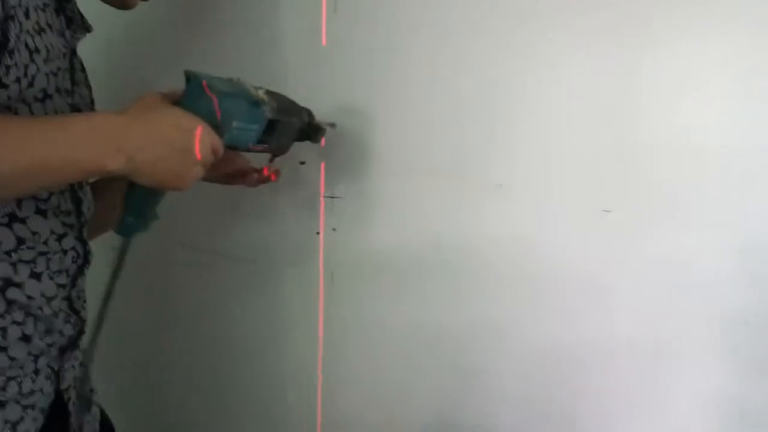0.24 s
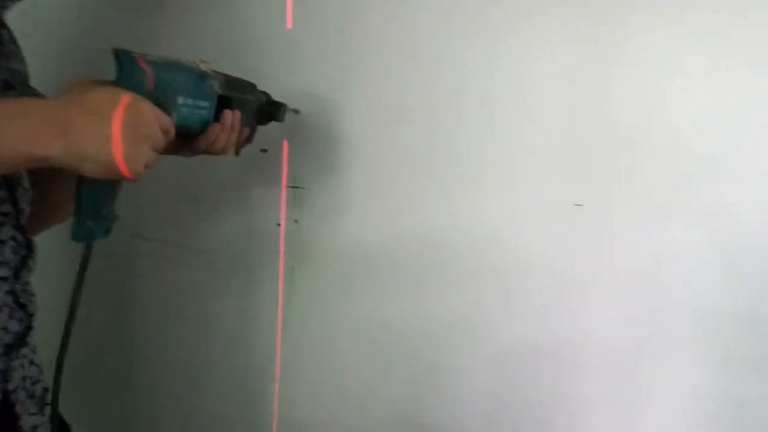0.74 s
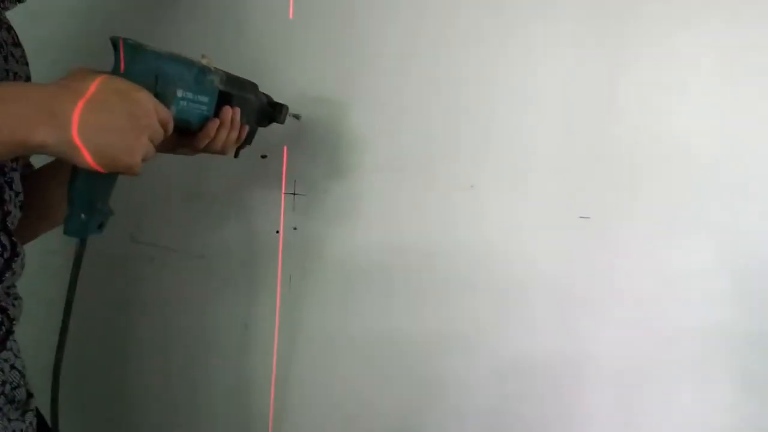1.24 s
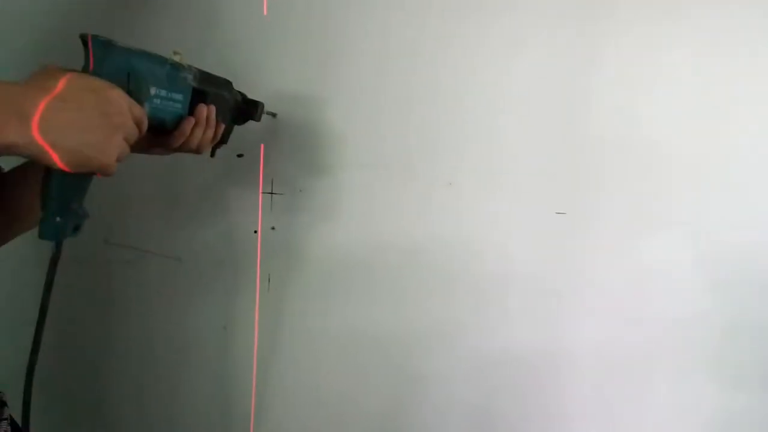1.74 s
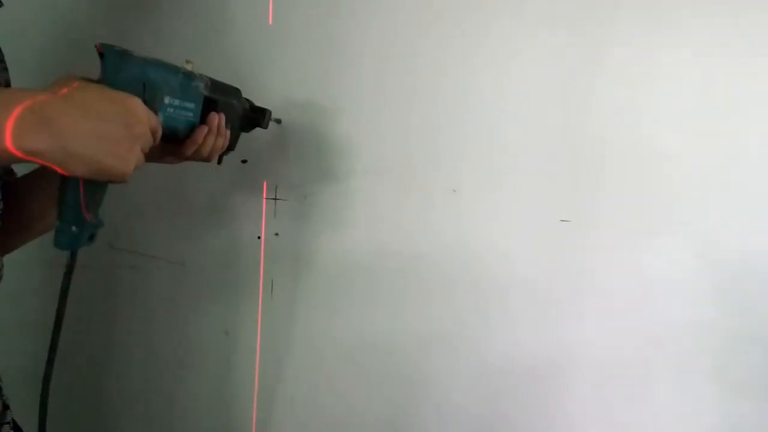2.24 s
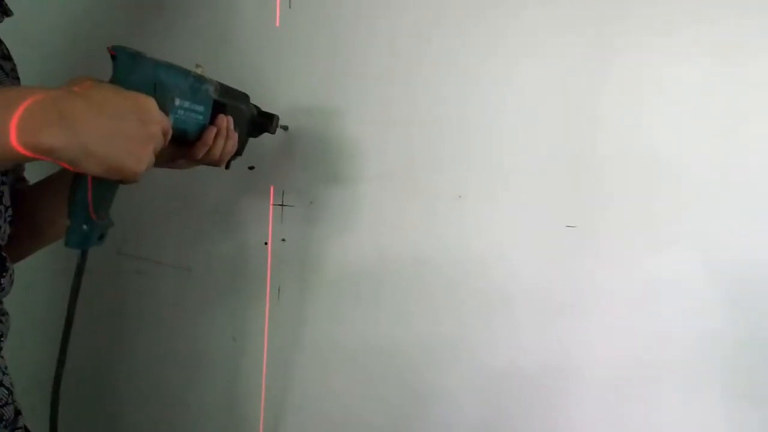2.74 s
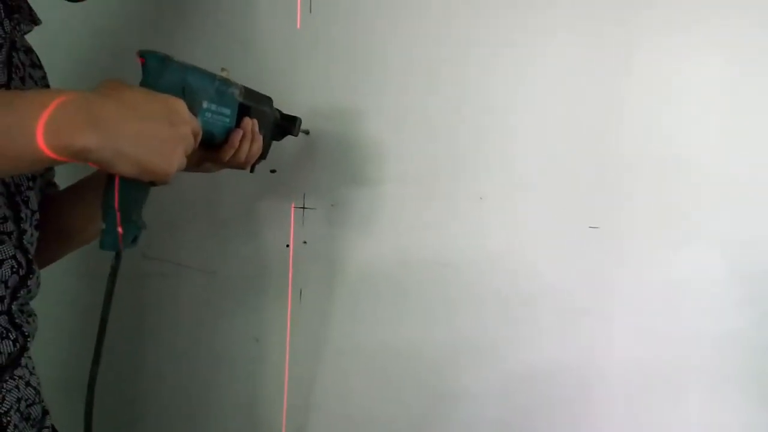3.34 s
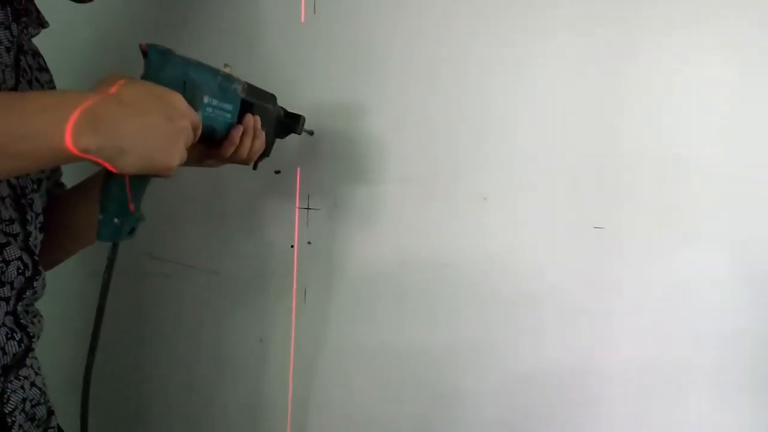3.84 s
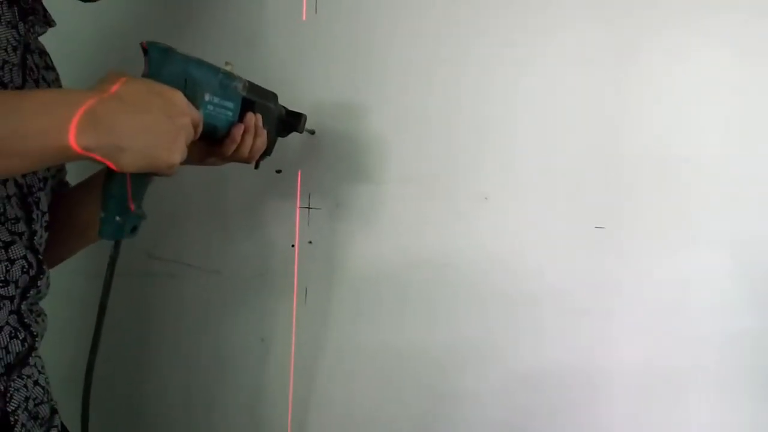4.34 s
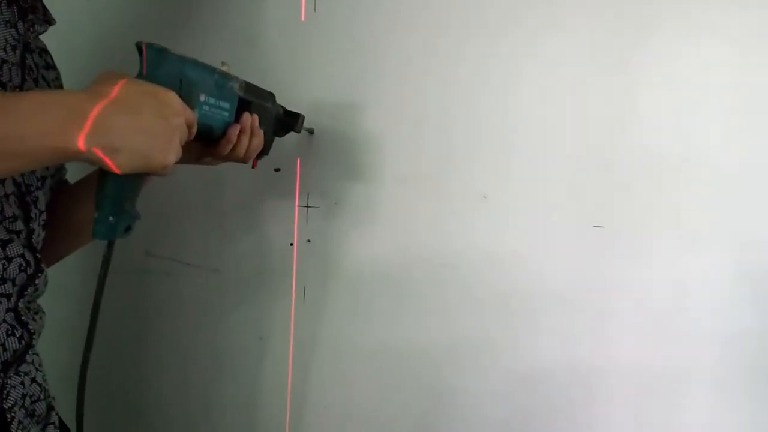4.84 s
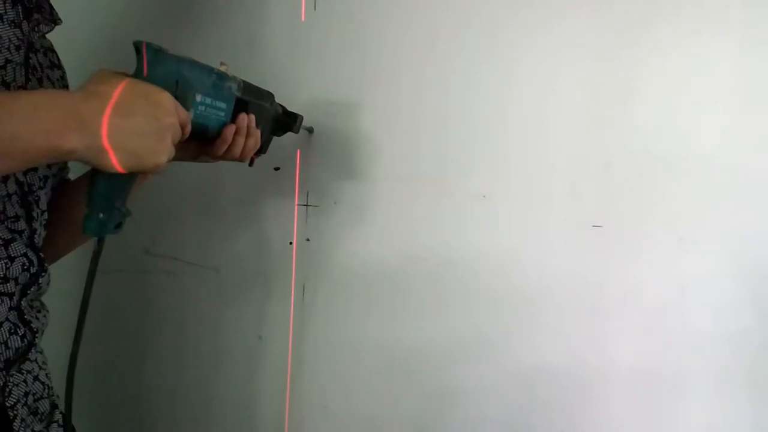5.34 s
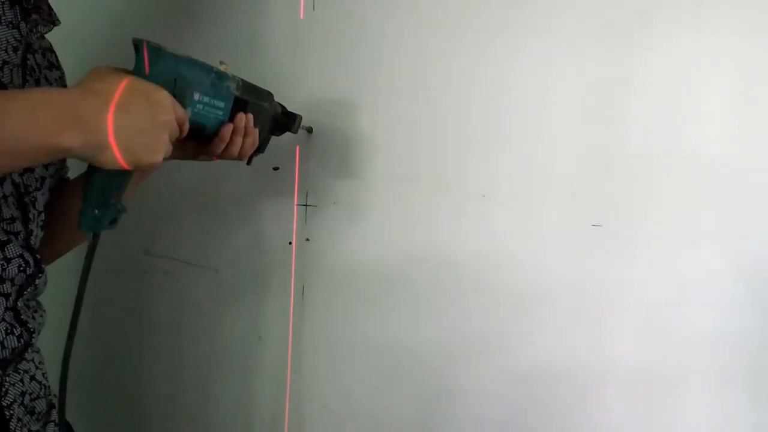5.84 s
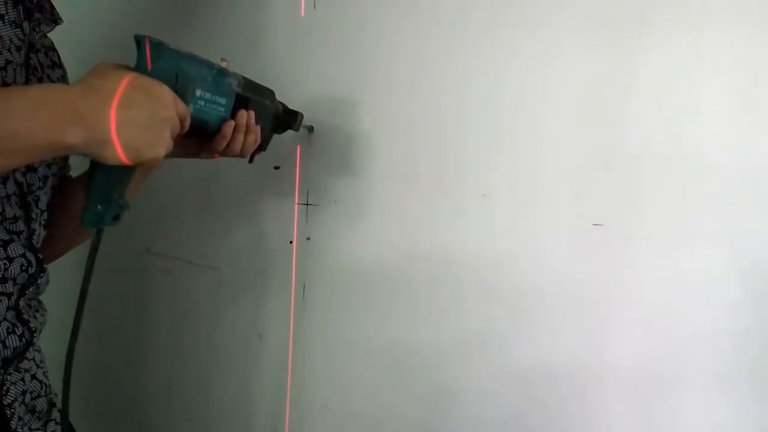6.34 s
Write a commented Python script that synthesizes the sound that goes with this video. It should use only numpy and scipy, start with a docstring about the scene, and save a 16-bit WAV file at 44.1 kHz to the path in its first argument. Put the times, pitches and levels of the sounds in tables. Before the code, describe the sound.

In a bare, reverberant room, faint hiss and a few light bit taps precede a hammer drill. A weak short burst clatters and slows, then a stronger one, then a long loud hammering with deep thumps, each coasting down into echo. A fourth burst speeds up and is cut off. Close stereo microphones overload slightly on the loudest blows.

```python
"""In a bare, echoing room, a hammer drill bites into a masonry wall in four bursts, the last cut off at speed.
Each trigger pull spins up a ratchet, one blow per slipping tooth: single blows speed up to a rattle, then
slow as the motor coasts. Steel modes ring near 6 kHz, pushes and grit knock the wall, noise is the fan and
gear roar; light ticks, far wash and faint tones surround it. The loudest blows overload the microphones."""
import sys
import numpy as np
from scipy import signal
from scipy.fft import rfft, irfft, next_fast_len
from scipy.io import wavfile
from scipy.ndimage import map_coordinates

SR = 44100
rng = np.random.default_rng(int(sys.argv[2]) if len(sys.argv) > 2 else 0)


def master_out(mix):
    """Clip the mix to full scale and print it as 16-bit PCM to the path in sys.argv[1]."""
    frames = np.transpose(np.atleast_2d(mix))
    ceiling = np.clip(frames, -1, 1)
    pcm = np.round(ceiling * 32767).astype(np.int16)
    wavfile.write(sys.argv[1], SR, pcm)


N = 290619

# Ringing modes of bit and chuck. Each row: frequency in Hz, relative level in dB, t60 in seconds.
STEEL_MODES = [(4500, 1, 0.0055), (5533, 4.5, 0.011), (6460, 9, 0.0084), (6524, 7, 0.011),
               (7020, -8.5, 0.018), (7540, 5.5, 0.0035), (8890, 3, 0.0059), (13450, -9.5, 0.024),
               (14700, -37, .012)]
# Colours of the layers, from crushed grit to far wash. Each row: frequency in Hz, relative level in dB per Hz.
CRACK_COLOUR = [(500, -58), (4000, -5.5), (6000, 4.5), (8500, -24.5), (11000, -7.5), (15000, -23)]
WALL_COLOUR = [(60, -37), (130, -18.5), (220, -9), (500, -1.5), (1100, 5), (1900, 3), (2800, -2.5),
               (4500, -6.5), (6500, -0.5), (8000, -8), (10500, -14.5), (15000, -9.5)]
THUMP_COLOUR = [(20, -12), (60, 1), (130, 2.5), (350, -2), (700, -21), (2000, -68)]
REBOUND_COLOUR = [(400, -24), (1500, 1), (3500, -9), (6400, 2), (8500, 1.5), (15000, -39)]
ROAR_COLOUR = [(40, -21.5), (130, -31), (230, -11.5), (500, -7.5), (1000, -1), (1900, 4.5), (2800, 0.5),
               (4200, 0), (6500, 1.5), (8000, -11), (10500, -17), (15000, -39)]
TICK_COLOUR = [(200, -16), (1500, -5.0), (6500, -5.5), (11000, -21.5), (15000, -33)]
WASH_COLOUR = [(30, -46), (60, -20), (100, -19.5), (190, -15), (400, -14), (780, -9.5), (1400, -8),
               (2300, -9.5), (2700, -15), (4500, -18), (6200, -19.5), (9000, -33.5), (11000, -45),
               (15000, -70)]
# Tone of the ring sent into the room. Each row: frequency in Hz, gain in dB.
RING_ROOM_TONE = [(3000, 7.5), (6500, 2), (8000, -3), (10000, -11), (15000, -28)]
# Standing waves between the walls. Each row: frequency in Hz, width in Hz, gain in dB.
STANDING_WAVES = [(198.1, 3.1, -6.5), (236, 2.6, 2), (302.5, 3.1, -4), (383, 2.9, -6), (491.3, 2.35, 8),
                  (573, 8.6, 2.5), (720, 3.1, -9), (806, 2.4, 2.5), (1014, 3.4, -7), (1550, 2.5, -35),
                  (1570, 7.1, -2), (1762, 5.6, 13)]
# Ratchet speed of each pull: spin-up and sometimes early slowing, until the drag rule takes over.
# Each row: time in seconds, teeth a second.
PULL_SPEEDS = [
    [(1.5, 5.53), (1.739, 17.78), (1.904, 22.77), (2.057, 15.49)],
    [(2.893, 1.89), (3.102, 28.61), (3.295, 40.32), (3.395, 37.72), (3.628, 19.55), (3.768, 12.48)],
    [(4.27, 3.17), (4.475, 30.78), (4.64, 38.67), (4.899, 42.47), (5.21, 42.17), (5.382, 50.4),
     (5.597, 49.85)],
    [(6.16, 4.4), (6.331, 36.04), (6.57, 60.62)],
]
# When the first tooth slips. Each entry, one per pull: time in seconds.
FIRST_BLOW_TIMES = [1.583, 3.004, 4.351, 6.2145]
# How hard each pull is pressed. Each row: blow in dB, blow lost as the hand lets go in dB, knock in dB,
# thump in dB, roar in dB.
PULL_LEVELS = [(-8.5, 2, 4.5, -10, -6.5), (-3.5, 14, 3, -16, -6), (-2.5, 12, 3, 1, -4.5),
               (-8.5, 3, 4.5, -6, -6)]
# Moments when the low thump swells, or once dips. Each row: time in seconds, change in thump in dB.
THUMP_SURGES = [(3.165, 20), (3.5, 6), (3.565, 3), (4.68, 26), (4.745, 12), (5.004, 19.5), (5.152, 10.5),
                (5.42, -6)]
# The bit ticks on the wall as the drill is set or jerks into motion. Each row: start in seconds, strength in dB.
TICK_EVENTS = [(0.882, -37), (1.195, -34), (1.313, -43), (1.501, -26.5), (2.483, -31), (2.892, -26)]
# Decay of the bare room. Each row: frequency in Hz, t60 in seconds.
ROOM_DECAY = [(100, 1.1), (300, 2.06), (1000, 1.41), (2500, 1.186), (6000, 0.86), (9000, 0.66),
              (15000, 0.14)]
# Stereo width of diffuse sound. Each row: frequency in Hz, side over mid in dB.
STEREO_WIDTH = [(50, 2), (130, 16.5), (250, 14.5), (500, 7.5), (900, 4), (1500, -3), (2400, 1),
                (15000, 0.5)]
# Stereo lean of diffuse sound. Each row: frequency in Hz, left over right in dB.
STEREO_LEAN = [(60, -2), (200, -3), (600, -4), (1300, -2), (4400, -2.5), (8300, 4.5), (13000, -0.5)]
# Faint tones in the room. Each row: start in seconds, end in seconds, frequency in Hz, level at the start
# in dB, fall in dB a second.
FAINT_TONES = [(-.1, 1.3, 399, -52.5, 7), (-.1, 1.15, 806, -56, 4), (-.1, 0.85, 2390, -52, 3),
               (-.1, 0.812, 3020, -59, 10), (-.1, .8, 4020, -61.5, 3), (2.017, 2.6, 440, -32.5, 20)]

FULL_SPEED = 40  # working speed at which levels are given, teeth a second
COAST_S, FRICTION_TEETH_PER_S = 0.418, 14.85  # drag time constant; speed at which friction equals drag
BLOW_DB, BLOW_DB_PER_OCTAVE, UNEVEN_DB = 5.5, 5, 2.5  # faster teeth hit harder; scatter from blow to blow
SEAT_DB, SEAT_S = 19, 0.115  # the first blows are weaker until the bit is seated
LET_GO_S = 0.12  # time in which the hand eases off
KNOCK_DB_PER_OCTAVE = 2.5  # the wall's share of each blow grows with speed
BITE_DB, BITE_S = 12, 0.15  # the wall knocks less until the bit has bitten in
SLACK_KNOCK_SHARE = 0.43  # share of the blow's lost dB that the knock is given back as the hand lets go
THUMP_BITE_DB, THUMP_BITE_S = 20, 0.18  # deep thumps need a deeper hole and come later
SURGE_S = 0.017  # how long a thump surge takes to rise, and again to fall
ROAR_DB_PER_OCTAVE, ROAR_SWELL_S = 7, 0.054  # roar grows with speed and swells at switch-on
COAST_DROP_DB = 8  # the roar sinks as the drag rule takes over
TOP_HZ = 15600  # band limit


def amp(db):
    """Decibels to gain."""
    return 10 ** (np.asarray(db) / 20)


def unit(x):
    """Scaled to rms 1."""
    return x / np.sqrt(np.mean(x ** 2) + 1e-20)


def along(points, hz):
    """(Hz, value) points read on a log frequency axis."""
    f, v = np.transpose(points)
    return np.interp(np.log(hz + 1), np.log(f + 1), v)


def wobble(rate):
    """A smooth random curve, rate knots a second."""
    knots = rng.standard_normal(int(N * rate / SR) + 4)
    return map_coordinates(knots, [np.arange(N) * rate / SR])


def filtered(x, response):
    """x times a response of frequency."""
    n = x.shape[-1]
    m = next_fast_len(n + SR // 2, True)
    return irfft(rfft(x, m) * response(np.fft.rfftfreq(m, 1 / SR)), m)[..., :n]


def coloured(x, spectrum):
    """x through a spectrum that leaves the power of white noise unchanged."""
    return filtered(x, lambda hz: unit(amp(along(spectrum, hz))))


def diffuse(pair):
    """Two unrelated signals as sound from all around; its bass reaches the microphones in opposite phase."""
    mid, side = filtered(pair, lambda hz: amp(np.outer([0, 1], along(STEREO_WIDTH, hz))))
    left_right = np.array([mid + side, mid - side])
    return filtered(left_right, lambda hz: amp(np.outer([.5, -.5], along(STEREO_LEAN, hz))))


def placed(times, sounds):
    """Sum of short sounds, one row each, starting at their times."""
    at = np.round(np.abs(times) * SR).astype(int)[:, None] + np.arange(sounds.shape[1])
    return np.bincount(at.ravel(), sounds.ravel(), N)[:N]


def hammer(levels, ring_db=-12, ring_room_db=-18, crack_db=12.5, knock_db=14, grit_db=2,
           standing_db=23, crunch_db=3, rebound_db=2):
    """Blows ring the bit, knock the wall and crush its stone: (direct sound, sound sent into the room)."""
    times, force = ratchet(levels[0])
    knock, thump = amp(levels[1:])
    # each microphone sees its own side of the bit
    ring = np.array([steel(times, force), steel(times, force)])
    snaps = np.array([cracks(times, force, life=0.0007) for side in range(2)])
    crack = coloured(snaps, CRACK_COLOUR) * amp([[2], [-2.5]])

    push = placed(times, force[:, None])  # the same shape each time: a buzz at the tooth rate
    grit = np.array([cracks(times, force, life=0.0024) for side in range(2)])
    wall = coloured(knock * (amp(knock_db) * push + amp(grit_db) * grit[0]), WALL_COLOUR)
    boom = diffuse(filtered(knock * np.array([push, grit[1]]), standing))
    crunch = diffuse(coloured(grit, WALL_COLOUR))

    # a thump reaches the two microphones unequally
    rocking = rng.standard_normal((len(times), 2)).T
    shoves = np.array([placed(times, (force * (.5 + 0.73 * tilt))[:, None]) for tilt in rocking])
    deep = coloured(thump * shoves, THUMP_COLOUR)

    # the ring that fills the room is duller
    room_ring = filtered(steel(times, force, detune=0.047), lambda hz: amp(along(RING_ROOM_TONE, hz)))
    metal = wall_echo(amp(ring_db) * ring) + amp(crack_db) * crack + amp(rebound_db) * rebounds(times, force)
    stone = deep + amp(crunch_db) * crunch
    return metal + stone + amp(standing_db) * boom, wall + amp(ring_room_db) * room_ring


def ratchet(blow_db):
    """Time and force of the blows: one for each tooth that slips past."""
    hits = []
    for points, first in zip(PULL_SPEEDS, FIRST_BLOW_TIMES):
        teeth = np.cumsum(spin(points)) / SR
        slips = np.arange(teeth[round(first * SR)], teeth[-1])
        hits.append(np.searchsorted(teeth, slips))
    at = np.concatenate(hits)
    return at / SR, amp(blow_db[at] + UNEVEN_DB * rng.standard_normal(len(at)))


def spin(points):
    """Speed in one pull: along its given curve, then braked by drag and friction."""
    t = np.arange(N) / SR
    s, speed = np.transpose(points)
    given = np.interp(t, s, speed, left=0)
    drag = np.exp(-np.maximum(t - s[-1], 0) / COAST_S)
    return np.maximum((given + FRICTION_TEETH_PER_S) * drag - FRICTION_TEETH_PER_S, 0)


def effort():
    """Blow, knock, thump and roar curves in dB, from the speed, the hand's pressure and the thump surges."""
    t = np.arange(N) / SR
    on, off = np.transpose([(points[0][0], points[-1][0]) for points in PULL_SPEEDS])
    pull = np.maximum(np.searchsorted(on, t) - 1, 0)
    blow, slack, knock, thump, roar = np.array(PULL_LEVELS)[pull].T
    speed = np.max([spin(points) for points in PULL_SPEEDS], axis=0)
    octaves = np.log2(speed / FULL_SPEED + 1e-3)
    age = np.maximum(t - on[pull], 0)
    let_go = .5 + .5 * np.tanh((t - off[pull]) / LET_GO_S)
    unseated = np.exp(-(age / SEAT_S) ** 2)
    surges = sum(db * np.exp(-((t - s) / SURGE_S) ** 2) for s, db in THUMP_SURGES)
    swell = 20 * np.log10(1 - np.exp(-age / ROAR_SWELL_S) + 1e-6)
    into_wall = KNOCK_DB_PER_OCTAVE * octaves
    knock_bite = BITE_DB * np.exp(-age / BITE_S)
    thump_bite = THUMP_BITE_DB * np.exp(-age / THUMP_BITE_S)
    return (BLOW_DB + blow + BLOW_DB_PER_OCTAVE * octaves - SEAT_DB * unseated - slack * let_go,
            knock + into_wall - knock_bite + SLACK_KNOCK_SHARE * slack * let_go,
            thump + into_wall - thump_bite + surges,
            roar + ROAR_DB_PER_OCTAVE * octaves + swell - COAST_DROP_DB * let_go)


def steel(times, force, scatter_db=1.5, detune=0.035):
    """Each blow rings the bit's modes at new strengths and pitches, as the bit turns in its hole."""
    hz, db, t60 = np.transpose(STEEL_MODES)[:, :, None]
    t = np.arange(SR // 40) / SR
    size, pitch, phase = rng.standard_normal((len(times), 3, len(STEEL_MODES), 1)).swapaxes(0, 1)
    decay = np.exp(-np.log(1000) * t / t60)
    tone = np.sin(2 * np.pi * (hz * (1 + detune * pitch) * t + phase))
    modes = amp(db + scatter_db * size) * decay * tone
    ring = modes.sum(1) * (1 - np.exp(-t / 0.000054))  # a very short attack, in seconds
    return placed(times, force[:, None] * ring / ring.std(1, keepdims=True))


def cracks(times, force, life):
    """A short noise burst of crushed grit at each contact, dying with time constant life in seconds."""
    t = np.arange(SR // 40) / SR
    burst = rng.standard_normal((len(times), len(t))) * np.exp(-t / life)
    return placed(times, force[:, None] * burst / np.linalg.norm(burst, axis=1, keepdims=True))


def rebounds(times, force, scatter_db=4):
    """Between blows the bit skips in its hole, at uneven moments and strengths."""
    chance = rng.standard_normal((len(times), 2))
    late = np.clip(.014 + .004 * chance[:, 0], .005, .024)  # seconds after the blow
    strength = force * amp(scatter_db * chance[:, 1])
    skips = np.array([cracks(times + late, strength, life=0.0014) for side in range(2)])
    return coloured(skips, REBOUND_COLOUR)


def wall_echo(x, delay=0.0025, echo_db=-4):
    """The wall beside the bit throws each blow back about delay seconds later, a little apart on each side."""
    late = delay * rng.uniform(.85, 1.15, (2, 1))
    return filtered(x, lambda hz: 1 + amp(echo_db) * np.exp(-2j * np.pi * hz * late))


def standing(hz):
    """Response of the room's strongest standing waves, a sum of resonances."""
    return sum(amp(db) * 1j * hz * width / (centre ** 2 - hz ** 2 + 1j * hz * width)
               for centre, width, db in STANDING_WAVES)


def motor(roar_db, level_db=-8.0, flutter_db=-1.0, near_db=-9):
    """Fan, brushes and gears roar as noise with the motor: (direct sound, sound sent into the room)."""
    level = amp(level_db + roar_db + flutter_db * wobble(40))
    roar = level * coloured(rng.standard_normal((3, N)), ROAR_COLOUR)
    return amp(near_db) * diffuse(roar[1:]), roar[0]


def ticks(near_db=16, room_db=19):
    """Light touches of the bit on the wall, as noise bursts: (direct sound, sound sent into the room)."""
    times, db = np.transpose(TICK_EVENTS)
    touch = coloured(cracks(times, amp(db), life=0.007), TICK_COLOUR)
    return amp(near_db) * touch, amp(room_db) * touch


def room(x, build=0.0041):
    """Bare walls: a long stereo noise tail, built up within milliseconds, whose treble dies first."""
    hz, t, z = signal.stft(rng.standard_normal((2, 2 * SR)), SR, nperseg=256)
    t60 = along(ROOM_DECAY, hz)[:, None]
    decay = np.exp(-np.log(1000) * t / t60) * (1 - np.exp(-t / build))
    tail = signal.istft(z * decay / np.sqrt(t60), SR, nperseg=256)[1]
    return signal.fftconvolve(x[None], diffuse(tail / np.linalg.norm(tail[0])), axes=1)[:, :N]


def background(level_db=-48, fade=0.1):
    """A steady wash of far noise with a few faint, fading sine tones that come and go."""
    t = np.arange(N) / SR
    level = amp(level_db + 0.067 * wobble(2.5))
    wash = level * coloured(rng.standard_normal((2, N)), WASH_COLOUR)
    for start, end, hz, db, fall in FAINT_TONES:
        gate = np.clip(np.minimum(t - start, end - t) / fade + .5, 0, 1)
        drift = hz / 1500 * np.array([wobble(14), wobble(14)])  # phase in radians
        strength = amp(db - fall * np.maximum(t - start, 0)) * gate
        wash = wash + strength * np.sin(2 * np.pi * hz * t + drift)
    return diffuse(wash)


def scene():
    """One effort drives hammer and motor; all the drill's sounds share one room."""
    *blows, roar = effort()
    direct, sent = zip(hammer(blows), motor(roar), ticks())
    return sum(direct) + room(sum(sent)) + background()


def gain_control(x, threshold_db=-9.5, squeeze=0.69, memory=0.01):
    """Loud passages are turned down; as they end the gain recovers and draws out the echo."""
    keep = np.exp(-1 / (memory * SR))
    smoothed = signal.lfilter([1 - keep], [1, -keep], np.mean(x ** 2, axis=0))
    power = smoothed / amp(threshold_db) ** 2
    return x / np.sqrt(np.hypot(1, power)) ** squeeze


def record(dry, hardness=8):
    """Gain control, then peaks flatten at full scale; almost nothing is kept above the band limit."""
    held = gain_control(dry)
    clipped = held / (1 + np.abs(held) ** hardness) ** (1 / hardness)
    return filtered(clipped, lambda hz: 1 / (1 + (hz / TOP_HZ) ** 200))


dry = scene()
out = record(dry)
master_out(out)
```